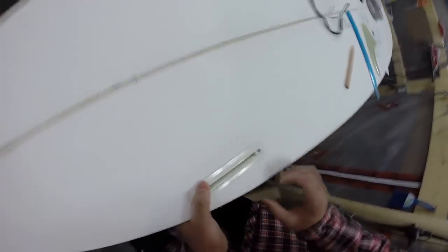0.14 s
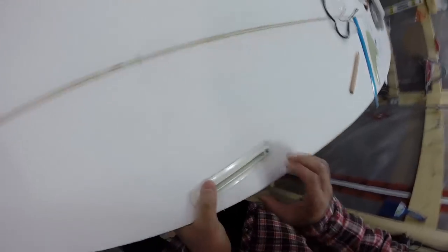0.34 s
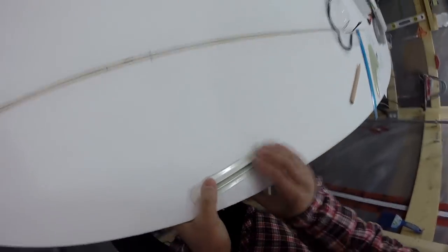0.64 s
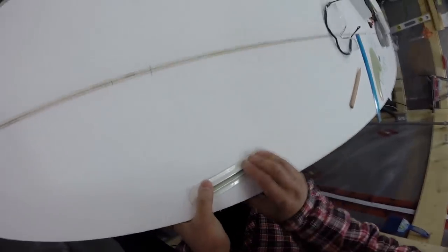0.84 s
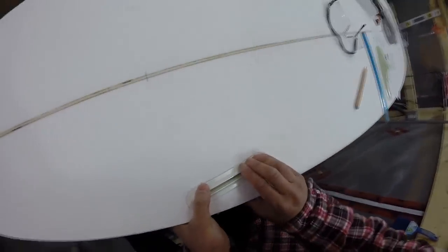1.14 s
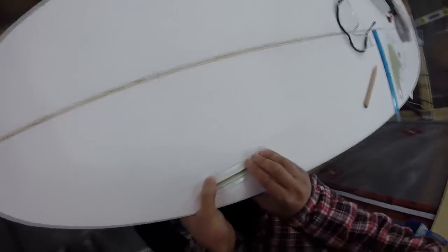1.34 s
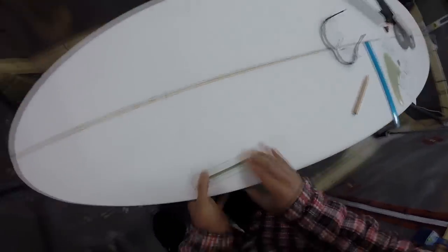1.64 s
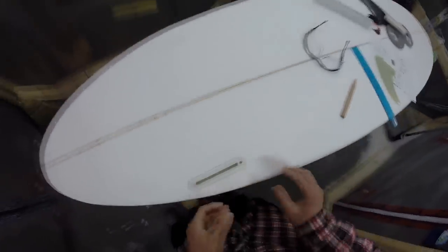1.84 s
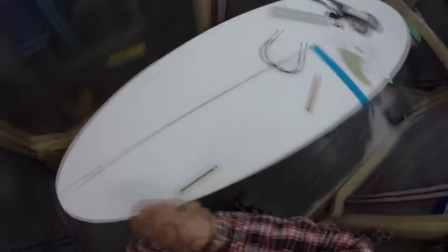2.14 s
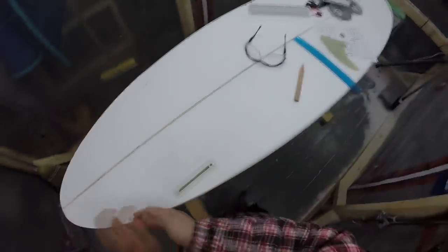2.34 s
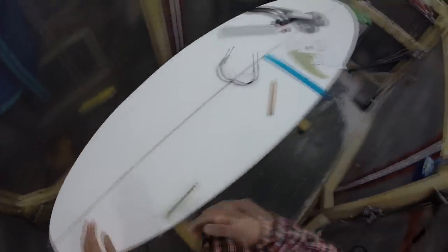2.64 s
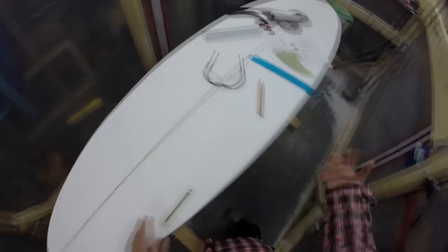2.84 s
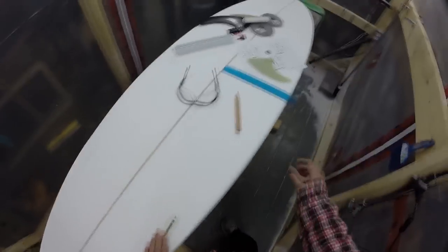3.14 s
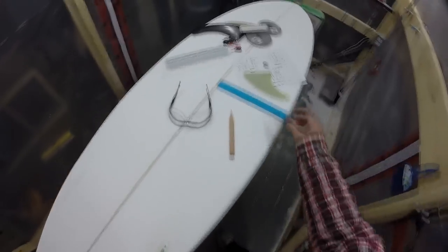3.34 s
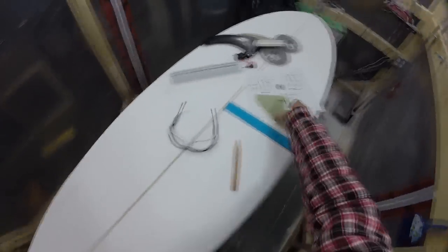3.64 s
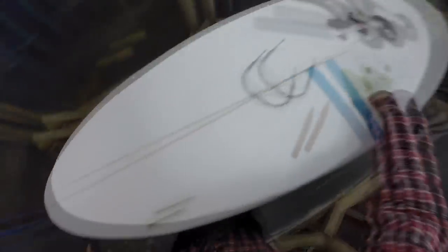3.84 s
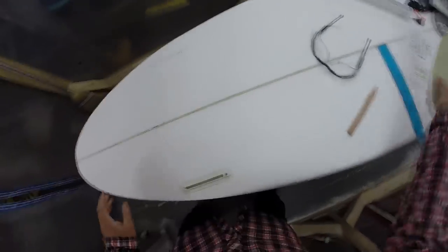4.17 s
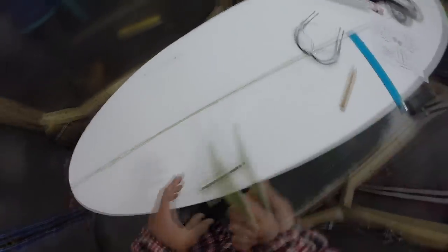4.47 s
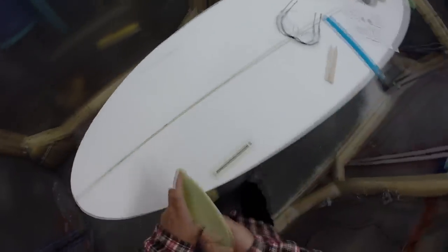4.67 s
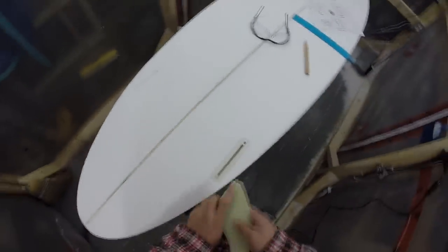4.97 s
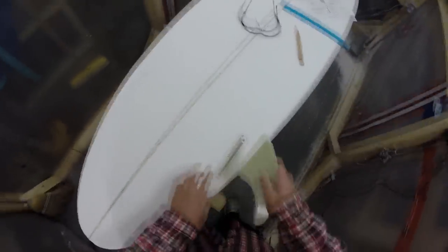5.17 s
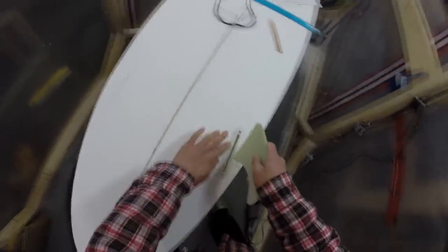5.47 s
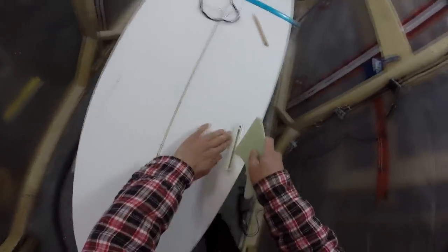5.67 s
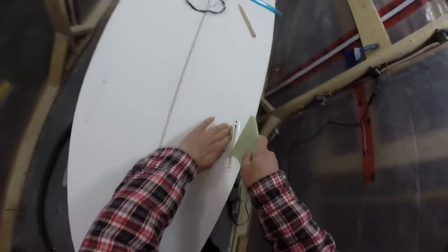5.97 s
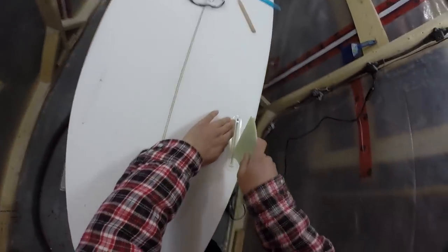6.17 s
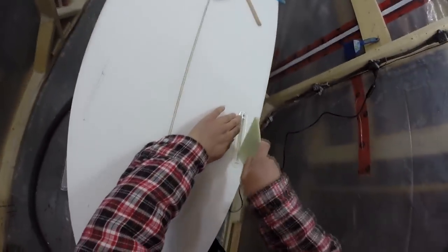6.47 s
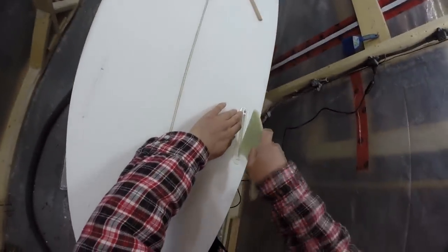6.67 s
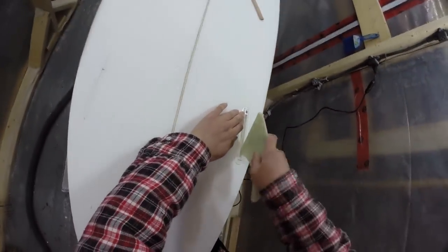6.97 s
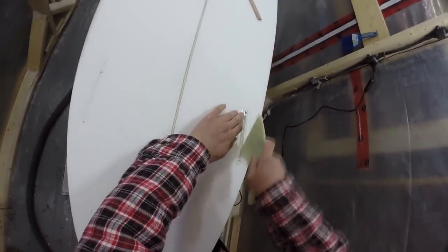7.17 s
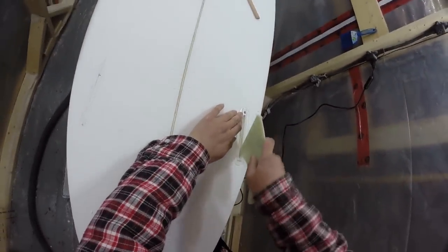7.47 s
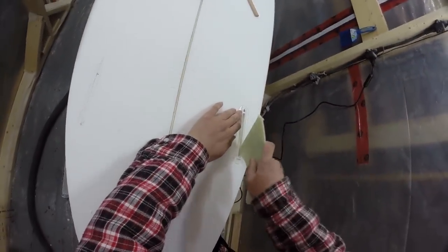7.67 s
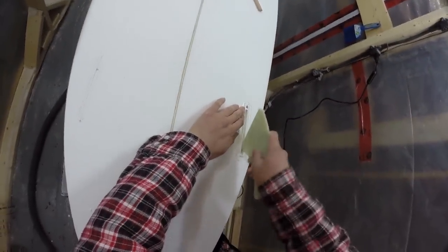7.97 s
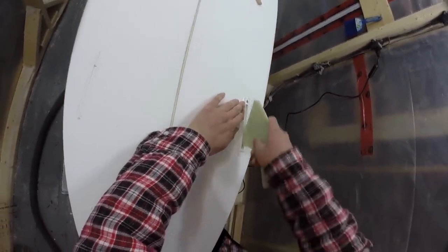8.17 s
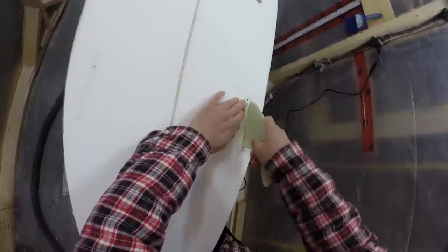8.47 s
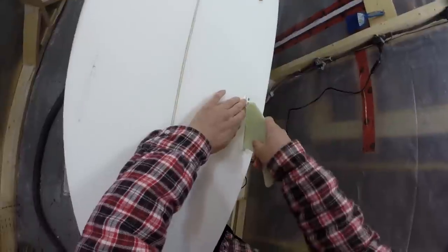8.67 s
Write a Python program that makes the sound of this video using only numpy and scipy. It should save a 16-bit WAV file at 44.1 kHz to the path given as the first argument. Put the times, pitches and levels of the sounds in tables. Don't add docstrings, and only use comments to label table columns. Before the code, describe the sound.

A low steady hum fills a small workshop, heard from a close head-worn microphone. From 0 to 0.8 s, soft finger rubbing on foam and two dull floor thumps. At 0.9-1.25 s a run of dry slipping clicks; at 1.55-1.75 s a denser, quickening burst with strong rubbing. Around 2.2-2.4 s dusty palms swish with a rising airy tone, and again briefly at 2.6 s. From 2.8 to 4.2 s quiet rubbing, faint squeaks, small pops, and a thump near 3.8 s. Two short swishes and a thump come around 4.4 s, soft thumps at 5.05 s, a stronger one at 5.54 s. The fin knocks hollowly at 5.77 and 5.96 s, with scraping. From 6 to 8 s there is light scratching and tiny ticks. A sharp click at 8.14 s precedes heavy, low pushing and two loud ringing knocks at 8.43 and 8.68 s, with a final rub.

```python
import sys
import numpy as np
from scipy import signal
from scipy.fft import rfft, irfft, next_fast_len
from scipy.io import wavfile
from scipy.ndimage import uniform_filter1d

SR = 44100
rng = np.random.default_rng(int(sys.argv[2]) if len(sys.argv) > 2 else 0)


def transcribe(signal):
    frames = np.atleast_2d(signal).T
    limited = np.clip(frames, -1, 1)
    pcm = np.round(limited * 32767).astype(np.int16)
    wavfile.write(sys.argv[1], SR, pcm)


def boost(x):
    u = np.asarray(x, float) / 20
    return 10 ** u


N = 388521
TIME = np.arange(N) / SR
BLOW = TIME[:SR // 4]
LEAD_S = 0.002


def rms_one(x):
    return x / np.sqrt(np.mean(x ** 2) + 1e-20)


def at_hz(points, hz):
    points = np.array(points)
    return np.interp(np.log(hz), np.log(points[:, 0]), points[:, 1])


def drift(rate_hz):
    r = np.exp(-80 * np.pi * rate_hz / SR)
    slow = signal.lfilter([1], [1, -2 * r, r * r], rng.standard_normal(N // 40 + 2002))[2000:]
    return np.interp(np.arange(N) / 40, np.arange(len(slow)), rms_one(slow))


def ring(x, hz, t60_s):
    r, w = boost(-60 / (t60_s * SR)), 2 * np.pi * hz / SR
    return signal.lfilter([0, np.sin(w)], [1, -2 * r * np.cos(w), r * r], x + 1e-18)


def cut(x, hz, kind):
    return signal.sosfilt(signal.butter(2, hz, kind, fs=SR, output="sos"), x)


def sweep(hz):
    return np.sin(2 * np.pi * np.cumsum(hz) / SR)


def grains(per_s, spread_db):
    sizes = boost(spread_db * np.minimum(rng.exponential(1, N), 5)) * rng.choice([-1, 1], N)
    return sizes * (rng.random(N) < per_s / SR)


def coloured(sources, spectrum, patchy_db):
    out, edges = 0, 20 * 2 ** np.arange(0, 9.6, 0.5)
    for k, (low, high) in enumerate(zip(edges, edges[1:])):
        centre_hz = min(np.sqrt(low * high), 11700)
        gain = boost(at_hz(spectrum, centre_hz) + patchy_db * drift(8.5))
        out = out + gain * cut(sources[k % 2], [low, high], "band")
    return rms_one(out)


def add(out, s, piece):
    i = round(s * SR)
    out[i:i + len(piece)] += piece[:N - i]


def contact_force(length_s):
    return np.cos(np.pi / 2 * np.clip((BLOW - LEAD_S) / (length_s / 2), -1, 1)) ** 2


def dying(hold_s, t60_s):
    onset = np.clip((BLOW - LEAD_S) / 0.00072, 0, 1)
    return boost(-60 * np.maximum(BLOW - hold_s, 0) / t60_s) * onset


def crackle(noise, low_hz, high_hz):
    return rms_one(cut(cut(noise, [low_hz, high_hz], "band"), 1.7 * high_hz, "low"))


# (frequency [Hz], density [dB])
ROOM = [(12, -30), (20, 0.0), (40, 1.5), (81, -1.5), (643, -17), (2470, -24), (4700, -30), (11100, -41),
        (12400, -43)]
ROOM_DB = -53.5


def room_hum():
    return boost(ROOM_DB) * coloured(rng.standard_normal((2, N)), ROOM, patchy_db=1.46)


# (frequency [Hz], level [dB], t60 [s])
BOARD = [(157, -10, 0.12), (243, -10, 0.08), (338, -1, 0.12), (420, -1.5, 0.12), (544, -1.5, 0.1),
         (602, -1.5, .1), (699, -2, 0.09), (860, -5, 0.11), (1040, -4, 0.1), (1170, -14, 0.065),
         (1275, -8, 0.08), (1378, -7, 0.12), (1650, -14, 0.065), (2100, 0, .06)]
SWAY_DB = -8.5


def board_push():
    shove = grains(1200, spread_db=2.5)
    modes = sum(boost(0.4 * db) * ring(shove, hz, 0.4 * t60_s) for hz, db, t60_s in BOARD[:7])
    push = cut(modes + 0.3 * ring(shove, 165, 0.048), [100, 560], "band")
    sway = cut(cut(shove, [45, 130], "band"), 40, "high")
    return rms_one(push) + boost(SWAY_DB) * rms_one(sway)


# (frequency [Hz], density [dB/Hz])
FOAM = [(210, -24), (350, -6.5), (632, 3.5), (1060, 3.5), (1550, 2.5), (1790, 0.5), (3230, -3.5),
        (11000, -58)]
FIN_RUB_TOP_HZ = 2220


def foam_rub(hand, fin):
    rub_db = 20 * np.log10(hand + fin)
    grit_db = np.clip(4.5 + 0.15 * (rub_db + 45), 2.5, 4.0)
    cells = [grains(2000, grit_db), grains(2000, grit_db)]
    cells = [c / np.sqrt(uniform_filter1d(c ** 2, size=6000) + 1e-9) for c in cells]
    modes = sum(boost(db) * ring(cells[0], hz, 1.5 * t60_s) for hz, db, t60_s in BOARD[4:])
    rub = coloured(cells, FOAM, patchy_db=2.5) + 0.35 * rms_one(modes)
    fin_rub = cut(rub, FIN_RUB_TOP_HZ, "low")
    return boost(0.31 * drift(27)) * (hand * rms_one(rub) + fin * rms_one(fin_rub))


# (frequency [Hz], density [dB/Hz])
CLOTH = [(1180, -36), (2000, -2), (2870, 2.5), (5340, 5.5), (8070, 0), (11100, -4), (12000, -9.5)]
DUST_EDGE_HZ = 6050
HAND_HISS_DB, HAND_DUST_DB, FIN_HISS_DB, FIN_DUST_DB = -12, -15.5, -16, -25.5


def cloth_and_dust(hand, fin, sleeve, skin):
    fibres = [grains(9000, spread_db=2.5), grains(9000, spread_db=2.5)]
    hiss = boost(1.73 * drift(24)) * coloured(fibres, CLOTH, patchy_db=0.5)
    cloth = rms_one(cut(hiss, 4040, "low"))
    dust = rms_one(cut(cut(hiss, DUST_EDGE_HZ, "high"), DUST_EDGE_HZ, "high"))
    cloth_gain = sleeve + boost(HAND_HISS_DB) * hand + boost(FIN_HISS_DB) * fin
    dust_gain = skin + boost(HAND_DUST_DB) * hand + boost(FIN_DUST_DB) * fin
    return cloth * cloth_gain + dust * dust_gain


STROKE_RANGE_DB = 15
STROKE_ROUNDING = 1.11


def strokes(rows):
    power = np.full((2, N), 1e-12)
    for s, swell_s, fade_s, *level_db in rows:
        near = slice(max(round((s - 3 * swell_s) * SR), 0), round((s + 3 * fade_s) * SR))
        away = np.maximum((s - TIME[near]) / swell_s, (TIME[near] - s) / fade_s)
        power[:, near] += boost(np.c_[level_db] - STROKE_RANGE_DB * away ** STROKE_ROUNDING) ** 2
    return np.sqrt(power)


# (top [s], swell [s], fade [s], rub [dB], push into board [dB])
HAND_RUBS = [(0, .1, 0.36, -53, -59), (.328, 0.085, 0.054, -48, -52), (.6, 0.43, 0.06, -62.5, -68),
             (.79, 0.084, 0.67, -52.5, -60), (.93, 0.01, 0.18, -44.5, -49.5),
             (1.105, 0.014, 0.18, -51, -57), (1.25, 0.2, 0.092, -44.5, -45.5),
             (1.345, 0.12, 0.05, -48.5, -61), (1.395, 0.054, .015, -54.5, -63), (1.51, .025, .1, -53, -58),
             (1.56, 0.055, 0.17, -47.5, -51.5), (1.73, 0.15, 0.054, -37.5, -43.5),
             (2.17, 0.013, 0.52, -67, -61), (2.61, 0.076, 0.081, -61, -64), (2.775, .008, 0.056, -60, -61),
             (3.05, 0.21, 0.11, -56.5, -57), (3.14, 0.095, 0.16, -51.5, -58.5),
             (3.265, .012, .09, -53, -60), (3.5, .4, 0.1, -56, -69), (3.55, .008, .12, -51, -66),
             (3.864, 0.092, 0.18, -58, -53.5), (3.97, .015, 0.046, -57.5, -67),
             (4.118, 0.059, 0.077, -54, -56), (4.53, .08, 0.21, -59, -50), (4.68, 0.07, 0.9, -58, -68),
             (5.03, 0.0092, 0.1, -52, -50), (5.43, 0.59, 0.048, -65, -65)]
# (top [s], swell [s], fade [s], rub [dB], push into board [dB])
FIN_RUBS = [(5.6, 0.14, 0.39, -57, -55), (5.84, 0.047, 0.12, -48.5, -58), (5.895, .01, 0.091, -45, -47),
            (5.93, 0.064, 0.24, -44.5, -41), (6.03, 0.15, 0.18, -51, -48), (6.356, 0.18, 0.063, -52, -52.5),
            (6.585, 0.061, 0.065, -48.5, -52.5), (6.694, 0.033, 0.14, -57, -54),
            (7.155, 0.032, 0.052, -55, -52), (7.272, .012, 0.039, -51.5, -50.5),
            (7.445, 0.013, 0.06, -46.5, -46), (7.72, 0.023, .08, -53.5, -52.5),
            (7.874, 0.013, 0.38, -55, -53), (8.074, 0.13, 0.056, -49.5, -41.5),
            (8.1, .008, 0.11, -49.5, -64.5), (8.28, .008, .15, -56, -55), (8.33, 0.013, 0.2, -42, -34.5),
            (8.365, 0.038, 0.096, -37.5, -28), (8.41, 0.14, 0.13, -44, -41), (8.5, 0.17, 0.4, -45.5, -47.5),
            (8.65, 0.007, .15, -55, -58), (8.786, 0.095, 0.091, -43, -32)]
# (top [s], swell
# [s], fade [s], cloth [dB], dust [dB])
RUSTLES = [(.2, 0.46, 0.23, -65, -75), (.328, 0.045, 0.073, -60.5, -59.5), (.58, .5, 0.044, -69.5, -76),
           (1.24, 0.35, 0.14, -56, -62), (1.52, 0.025, 0.13, -59, -64), (2.25, 0.06, 0.071, -53, -52),
           (2.295, 0.067, .05, -48.5, -44), (2.335, 0.076, 0.054, -48, -45),
           (2.61, 0.042, 0.049, -46.5, -40), (3.13, 0.096, 0.31, -66, -59.5), (3.41, 0.18, 0.22, -81, -64),
           (3.59, 0.16, 0.053, -55, -54), (3.864, 0.053, 0.22, -61.5, -62),
           (4.118, 0.035, 0.093, -57.5, -55), (4.36, 0.04, 0.16, -66, -60.5),
           (4.458, 0.12, 0.049, -55.5, -59), (4.68, 0.041, 0.46, -61, -82),
           (4.888, 0.33, 0.051, -61.5, -66), (5.1, .1, 0.24, -66.5, -69.5), (5.84, 0.21, 0.12, -60, -63.5),
           (5.92, 0.058, 0.11, -59, -61), (6.214, 0.29, 0.11, -60.5, -63), (7.455, 0.029, .08, -61, -66),
           (7.92, 0.039, 0.51, -63.5, -68), (8.14, .003, .07, -53, -60), (8.33, .01, .12, -58, -68),
           (8.38, 0.05, 0.1, -57, -66), (8.428, .003, .09, -53, -64), (8.69, 0.034, 0.068, -50.5, -55.5)]


def friction():
    hand, hand_push = strokes(HAND_RUBS)
    fin, fin_push = strokes(FIN_RUBS)
    sleeve, skin = strokes(RUSTLES)
    push = (hand_push + fin_push) * board_push()
    return push + foam_rub(hand, fin) + cloth_and_dust(hand, fin, sleeve, skin)


# (time [s], peak [dB], boom [dB], thud
# [Hz], slap [dB])
THUMPS = [(0.269, -29.5, -15.5, 400, -12), (0.767, -28, -11.5, 120, -28), (1.272, -35, -10, 156, -18),
          (3.789, -26.5, -29, 203, -17.5), (3.861, -32.5, -24, 142, -16), (4.491, -27.5, -6.5, 112, -9.5),
          (4.729, -42, -8.5, 386, -19), (5.036, -27.5, -12, 91.5, -5), (5.049, -25, -12, 126, -11),
          (5.081, -28.5, -20.5, 100, -5), (5.526, -32, -15, 91.5, -10.5), (5.543, -15.5, -10.5, 100, -14.5),
          (5.99, -30, -19, 160, -25)]
# (frequency [Hz], level [dB], t60 [s])
FLOORBOARD = [(61.8, -5, 0.55), (110, -9, 0.15), (162.2, -0.5, 0.15), (241.5, -7.5, 0.15), (363, -30, 0.11)]
BOOM_TWIN, BOOM_TWIN_SHARE = 1.2, 0.5
SLAP_TOP_HZ = 860


def thumps():
    out, t = np.zeros(N), TIME[:SR // 2]
    noise = rng.standard_normal((len(THUMPS), len(BLOW)))
    strengths_db = rng.normal(0, 2.7, (len(THUMPS), len(FLOORBOARD)))
    push = np.sin(np.pi * np.minimum(t / 0.002, 1)) ** 2
    push = push / push.sum()
    low_hz, _, low_t60_s = FLOORBOARD[0]
    twin = BOOM_TWIN_SHARE * ring(push, BOOM_TWIN * low_hz, low_t60_s)
    for (s, peak_db, boom_db, thud_hz, slap_db), puff, own_db in zip(THUMPS, noise, strengths_db):
        modes = [boost(db + o) * ring(push, hz, t60_s) for (hz, db, t60_s), o in zip(FLOORBOARD, own_db)]
        lowest = modes[0] / boost(own_db[0])
        boom = boost(boom_db + 8.5) * (lowest + twin) * np.minimum(t / 0.012, 1)
        thud = ring(push, thud_hz, 0.13)
        slap = dying(0.0065, 0.13) * crackle(puff, 202, SLAP_TOP_HZ)
        add(out, s + 0.0013, boost(peak_db - 5.5) * (boom + thud + boost(-5.5) * sum(modes[1:])))
        add(out, s - 0.001, boost(peak_db + slap_db - 6) * slap)
    return out


# (start [s], end [s], pitch [Hz], width [Hz], level [dB])
SQUEAKS = [(2.775, 3.12, 1520, 50, -63), (3.255, 3.33, 1850, 160, -62), (3.88, 4.14, 900, 80, -68),
           (4.5, 5.05, 1470, 150, -64), (4.64, 4.95, 2520, 150, -67), (5.27, 5.36, 1520, 100, -67),
           (5.17, 5.23, 1800, 120, -66), (3.255, 3.33, 1400, 200, -55), (.28, .46, 385, 25, -62)]
SQUEAK_SAG, SQUEAK_STEADY_HZ = 0.11, 19


def squeaks():
    out = np.zeros(N)
    for start, end, hz, width_hz, level_db in SQUEAKS:
        done = np.linspace(0, 1, round((end - start) * SR))
        inside = np.minimum(done * 30, 1) * (1 - done) ** 0.4
        waver = rms_one(cut(rng.standard_normal(SR), width_hz, "low"))[-len(done):]
        waver = waver + SQUEAK_STEADY_HZ / width_hz
        sag = SQUEAK_SAG * min(70 / width_hz, 1) ** 2
        add(out, start, inside * boost(level_db) * waver * sweep(hz * (1 - sag * done)))
    return boost(6.5) * out


# (peak time [s], peak [dB], contact
# [Hz], crack [dB])
SLIPS = [(.8237, -45, 1500, -62), (0.9261, -23, 1170, -50), (.951, -32, 1100, -56), (.973, -36, 1300, -56),
         (0.9969, -33, 800, -62), (1.0268, -29, 1200, -53), (1.074, -28, 1030, -52),
         (1.102, -25.5, 1100, -48), (1.149, -36, 800, -55), (1.17, -31, 1100, -56), (1.188, -31, 1000, -50),
         (1.2142, -31.5, 1660, -65), (1.2394, -31, 1450, -47), (1.3304, -39, 1790, -49),
         (1.5698, -34, 800, -58), (1.592, -31, 1000, -55), (1.6063, -26.5, 1000, -48),
         (1.617, -30, 950, -54), (1.6246, -27, 1100, -50), (1.6455, -25.5, 950, -46),
         (1.658, -31, 900, -54), (1.682, -26, 1050, -48), (1.6989, -22, 1100, -40), (1.712, -28, 1100, -43),
         (1.7166, -25, 2210, -54), (1.731, -26, 1290, -44), (1.7442, -25, 1690, -50),
         (2.103, -55, 3000, -63), (2.1695, -39, 1960, -57), (2.1952, -45, 1540, -57),
         (2.4188, -45, 804, -75), (2.772, -46, 1480, -59), (3.0484, -35, 1640, -58),
         (3.2632, -45, 1780, -70), (3.547, -36, 1500, -58), (4.494, -44, 900, -66), (5.038, -40, 1000, -64),
         (5.5445, -33, 1500, -56), (5.556, -38, 1900, -62)]
# (peak time [s], peak [dB], contact [Hz], crack [dB], crack [Hz])
TICKS = [(6.5718, -43, 1270, -62, 3200), (6.699, -38.5, 630, -76, 3200), (5.905, -38, 1100, -55, 3000),
         (5.921, -36, 900, -54, 3000), (5.94, -38, 1200, -56, 3500), (5.975, -32, 1300, -50, 2600),
         (5.998, -33, 1100, -50, 3000), (6.008, -31, 900, -52, 2200), (7.139, -42, 1020, -75, 3200),
         (7.2262, -41, 1150, -80, 3200), (7.2297, -39.5, 1300, -58, 4670), (7.2681, -36, 1200, -54, 3480),
         (7.4386, -30, 1100, -47.5, 4060), (7.4487, -32, 1000, -54, 4000), (7.7133, -58, 1720, -77, 3200),
         (7.8695, -46, 930, -61, 3500), (7.984, -40, 3110, -58, 4300), (8.011, -42, 1200, -58, 4300),
         (8.0534, -40, 880, -61, 3200), (8.0974, -32.5, 1130, -52.5, 4000), (8.1379, -19, 1450, -41, 2920),
         (8.2795, -47, 1500, -60, 4000)]
SLIP_RATTLE_DB, TICK_RATTLE_DB = -17, -16.5
SLIP_CRACK_HZ, SNAP_DB, SNAP_T60_S = 3200, -4, 0.03


def clicks():
    out = np.zeros(N)
    rows = [(*row, SLIP_CRACK_HZ, SLIP_RATTLE_DB) for row in SLIPS]
    rows += [(*row, TICK_RATTLE_DB) for row in TICKS]
    noise = rng.standard_normal((len(rows), 2, len(BLOW)))
    for (s, peak_db, contact_hz, crack_db, crack_hz, rattle_db), (dull, bright) in zip(rows, noise):
        tick = cut(ring(contact_force(0.35 / contact_hz), contact_hz, 3.9 / contact_hz), 147, "high")
        rattle = dying(0.0055, 0.2) * crackle(dull * abs(dull), 0.5 * contact_hz, 1.35 * contact_hz)
        crack = dying(0.0059, 0.17) + 2.0 * contact_force(0.0017)
        crack = crack * crackle(bright, 0.72 * crack_hz, 1.29 * crack_hz)
        snap = dying(LEAD_S, SNAP_T60_S) * crackle(dull, 4500, 8800)
        piece = boost(peak_db) * tick / tick.max() + boost(peak_db + rattle_db) * rattle
        piece += boost(crack_db) * crack + boost(crack_db + SNAP_DB) * snap
        add(out, s - LEAD_S, piece)
    return out


# (start [s], end [s], level [dB], cavity at start [Hz], cavity at end [Hz])
WIPES = [
    (2.2, 2.393, -43.5, 1150, 2996),
    (2.547, 2.66, -60, 1950, 3150),
    (4.328, 4.446, -44.5, 3540, 2370),
    (4.42, 4.503, -45, 2400, 2820),
]
WIPE_EDGE_DB = 17


def wipes():
    out = np.zeros(N)
    for start, end, level_db, from_hz, to_hz in WIPES:
        done = np.clip((TIME - start) / (end - start), 0, 1)
        inside = np.clip(np.minimum(TIME - start, end - TIME) / 0.02, 0, 1)
        level = boost(level_db - 8 - WIPE_EDGE_DB * abs(2 * done - 1.15))
        width = rms_one(cut(rng.standard_normal(N), 170, "low"))
        out += inside * level * width * sweep(from_hz * (to_hz / from_hz) ** done)
    return out


# (time [s], peak [dB], pitch
# [Hz], t60 [s])
POPS = [(2.1952, -35.5, 1430, .025), (2.281, -46, 1640, 0.072), (2.4175, -51, 820, 0.016),
        (2.7723, -38.5, 1530, 0.027), (3.262, -44.5, 730, 0.18), (5.046, -42, 1600, .03),
        (5.0855, -38, 1010, .05), (5.545, -40, 1350, .08)]


def pops():
    out = np.zeros(N)
    for s, peak_db, hz, t60_s in POPS:
        pop = ring(contact_force(0.6 / hz), hz, t60_s)
        add(out, s - LEAD_S, boost(peak_db) * pop / pop.max())
    return out


# (peak time [s], peak [dB], contact [Hz], ringing [dB], crack [dB])
KNOCKS = [(5.7658, -8, 520, -22, -44), (5.9582, -14, 440, -24, -35.5), (8.4257, -1.5, 765, -18.5, -36),
          (8.6828, -5.5, 660, -22, -34), (8.326, -26, 320, -36, -66), (5.8912, -30, 360, -43.5, -70),
          (8.6467, -30, 1800, -56, -46.5)]
# (favoured [Hz], gain [dB], starved [Hz], loss [dB])
KNOCK_PLACES = [(520, 4, 250, 5), (520, 4, 270, 5), (1200, 4, 500, 4), (338, 3, 430, 5), (420, 2, 700, 0),
                (560, 5, 250, 3), (1300, 0, 400, 0)]
PLACE_WIDTH_OCT = 0.33
KNOCK_RATTLE_DB = -7


def knocks():
    out = np.zeros(N)
    noise = rng.standard_normal((len(KNOCKS), 3, len(BLOW)))
    strengths_db = rng.normal(0, 1.9, (len(KNOCKS), len(BOARD)))
    mode_hz = np.array(BOARD)[:, 0]

    def near(hz):
        return 2 ** -(np.log2(mode_hz / hz) / PLACE_WIDTH_OCT) ** 2

    for knock, (chatter, dull, bright), own_db, place in zip(KNOCKS, noise, strengths_db, KNOCK_PLACES):
        s, peak_db, contact_hz, modes_db, crack_db = knock
        favoured_hz, gain_db, starved_hz, loss_db = place
        own_db = own_db + gain_db * near(favoured_hz) - loss_db * near(starved_hz)
        force = contact_force(0.57 / contact_hz)
        pulse = cut(force, [0.2 * contact_hz, 3.8 * contact_hz], "band")
        chatter = 0.031 * chatter * dying(12.8 / contact_hz, 0.034)
        drive = np.convolve(chatter, force[:200])[:len(BLOW)] + force
        slope = np.gradient(drive) * SR / (2 * np.pi * force.sum())
        body = sum(boost(db + o) * ring(slope / hz, hz, t60_s) for (hz, db, t60_s), o in zip(BOARD, own_db))
        body = cut(body, 130, "high") * dying(18 / contact_hz, 0.2)
        held = dying(12.2 / contact_hz, 0.16)
        rattle = held * crackle(dull, 0.54 * contact_hz, 2.23 * contact_hz)
        crack = crackle(bright, 1200, 2900) + 0.21 * crackle(dull, 3800, 4840)
        piece = boost(peak_db) * pulse / pulse.max() + boost(modes_db) * body
        piece += boost(modes_db + KNOCK_RATTLE_DB) * rattle + boost(crack_db) * dying(0.01, 0.19) * crack
        add(out, s - LEAD_S, piece)
    return out


# (frequency [Hz], t60 [s])
ECHO_T60_S = [(100, 0.88), (400, 0.25), (1100, 0.16), (3000, 0.12), (8000, 0.15)]


def workshop(x):
    size = next_fast_len(N + SR)
    hz = np.arange(size // 2 + 1) * SR / size + 1
    t60_s, total = at_hz(ECHO_T60_S, hz), 0
    for k, lag_s in enumerate(rng.uniform(0.008, 0.04, 10)):
        turn = boost(-60 * lag_s / t60_s) * np.exp(-2j * np.pi * hz * lag_s)
        total = total + (-1) ** k * turn / (1 - turn)
    return irfft(rfft(x, size) * total, size)[:N]


WALLS_PASS_HZ = 175


def scene():
    hits = thumps() + clicks() + pops() + knocks()
    echoes = boost(-18.0) * workshop(cut(hits, WALLS_PASS_HZ, "high"))
    return (room_hum() + friction() + squeaks() + wipes() + hits + echoes)[None]


def roll_off(x):
    return signal.sosfilt(signal.butter(12, 12540, fs=SR, output="sos"), x)


def record(dry):
    top_cut = signal.ellip(10, 0.5, 70, 12050, fs=SR, output="sos")
    mix = signal.sosfilt(top_cut, cut(dry, 14, "high"))
    return roll_off(mix)


dry = scene()
out = record(dry)
transcribe(out)
```